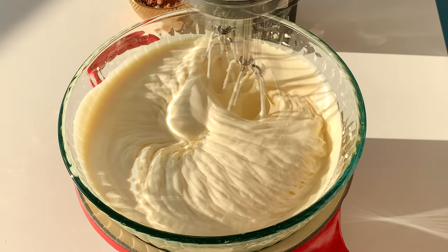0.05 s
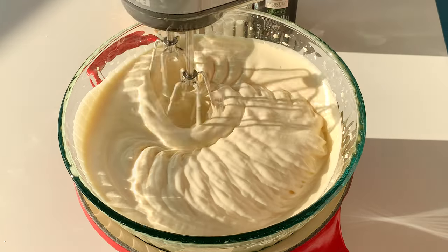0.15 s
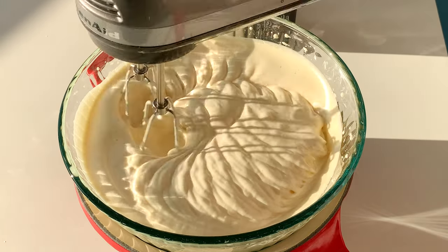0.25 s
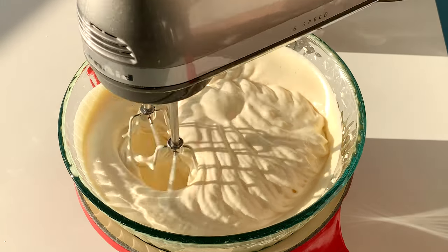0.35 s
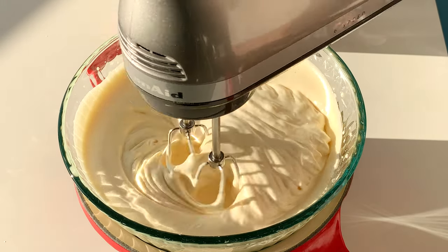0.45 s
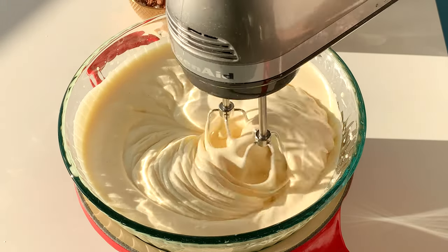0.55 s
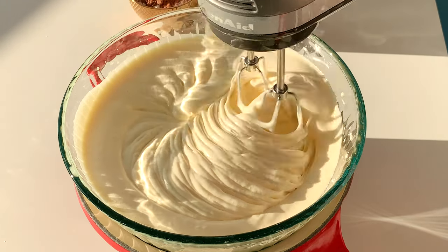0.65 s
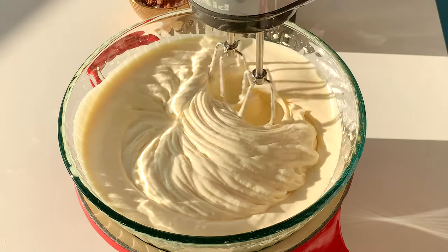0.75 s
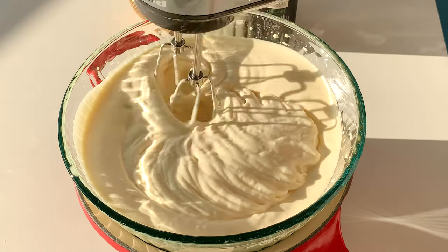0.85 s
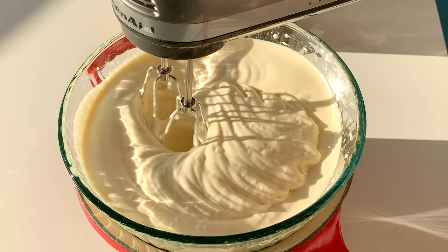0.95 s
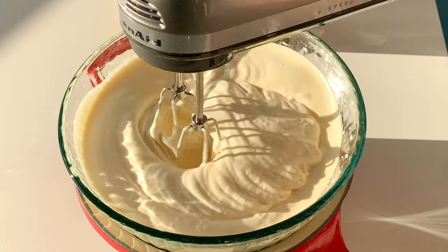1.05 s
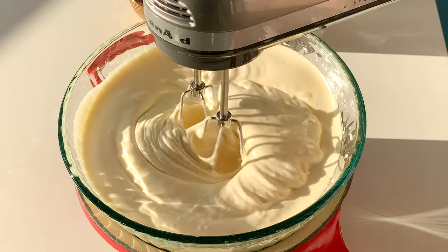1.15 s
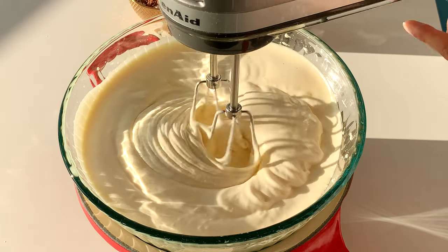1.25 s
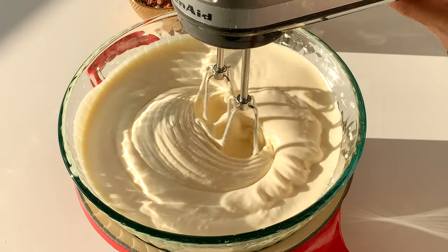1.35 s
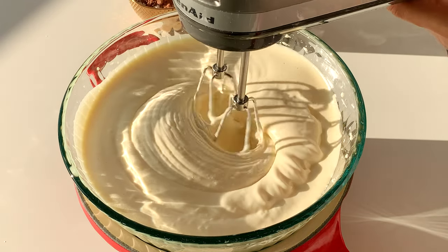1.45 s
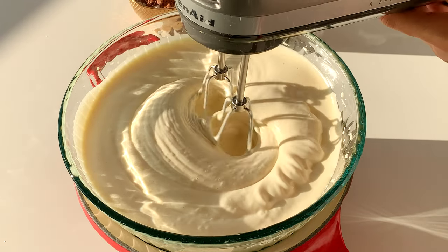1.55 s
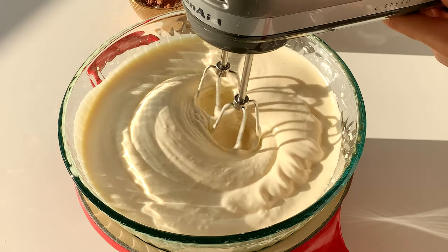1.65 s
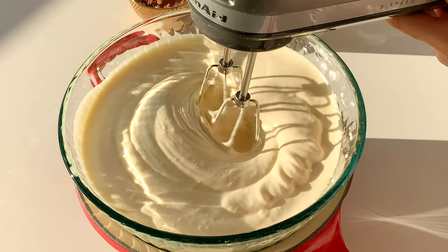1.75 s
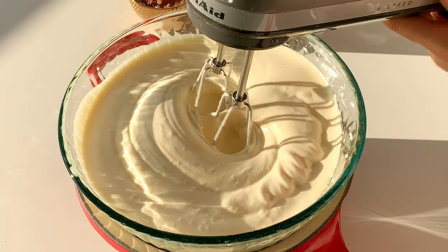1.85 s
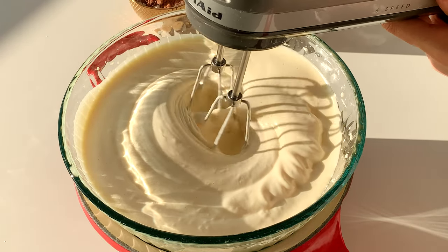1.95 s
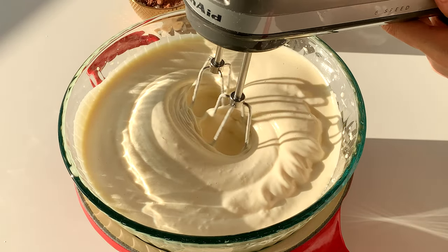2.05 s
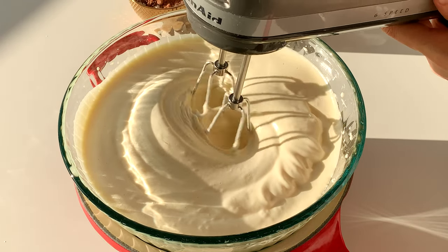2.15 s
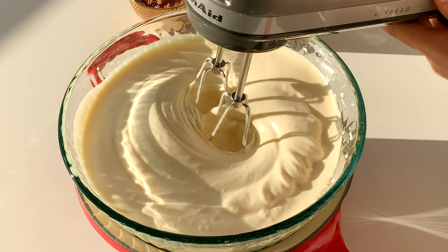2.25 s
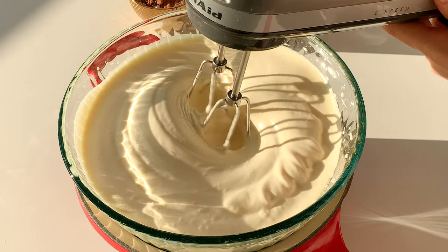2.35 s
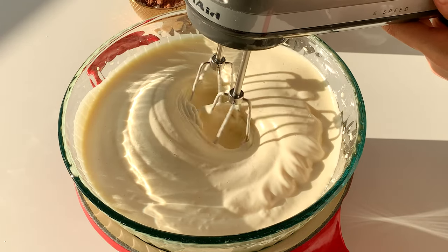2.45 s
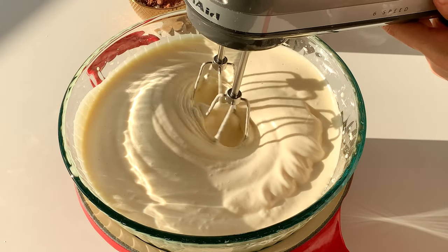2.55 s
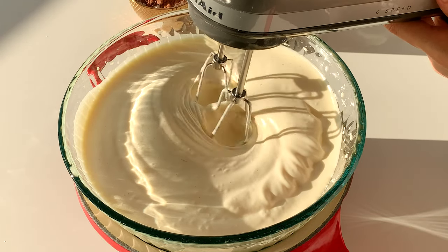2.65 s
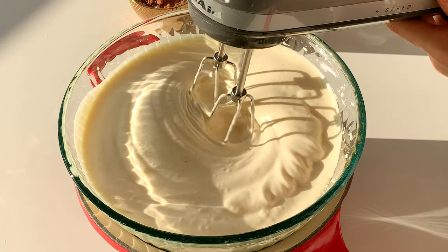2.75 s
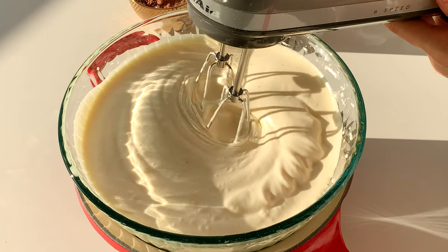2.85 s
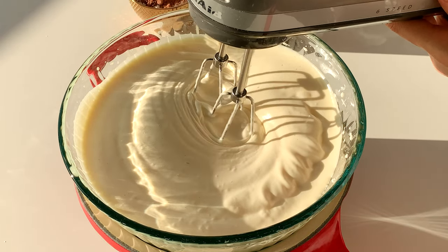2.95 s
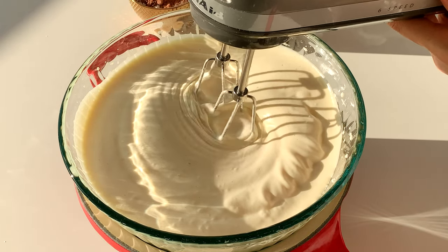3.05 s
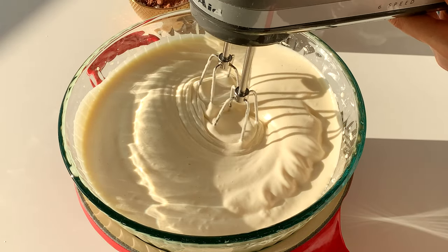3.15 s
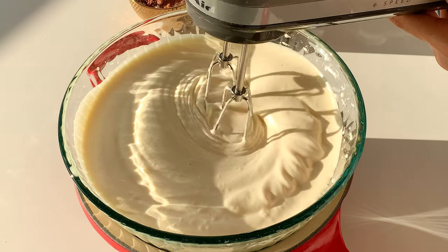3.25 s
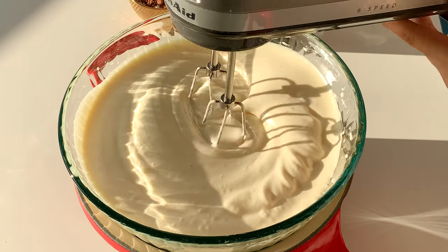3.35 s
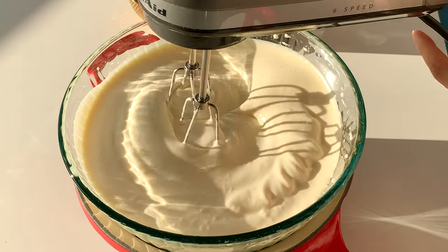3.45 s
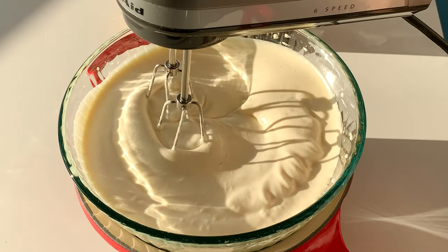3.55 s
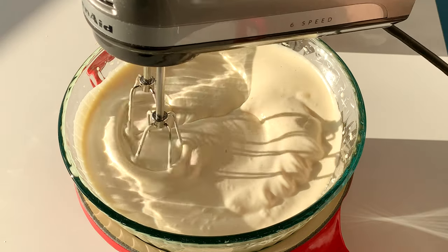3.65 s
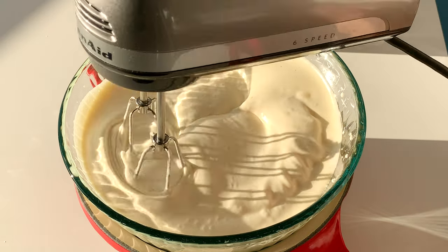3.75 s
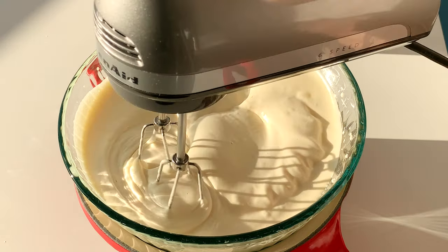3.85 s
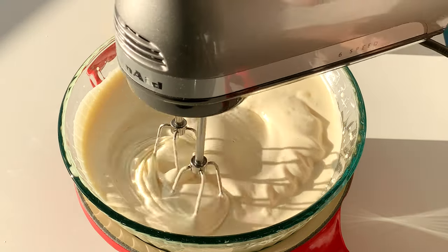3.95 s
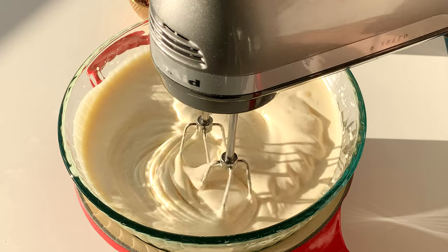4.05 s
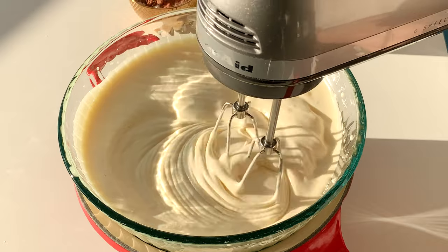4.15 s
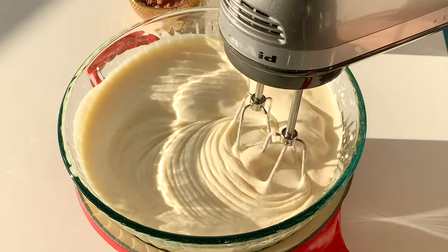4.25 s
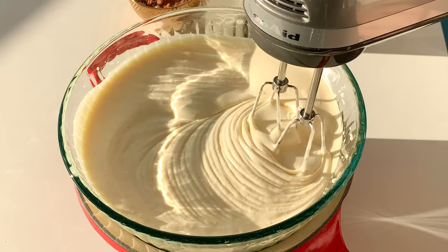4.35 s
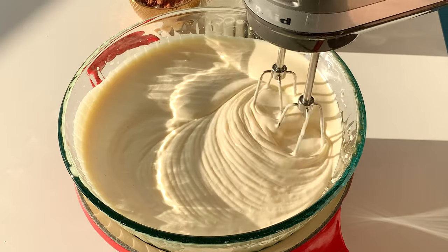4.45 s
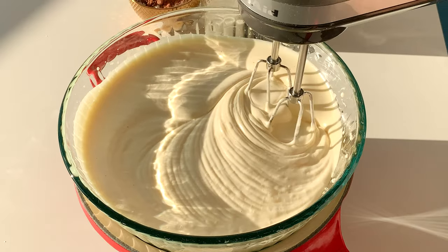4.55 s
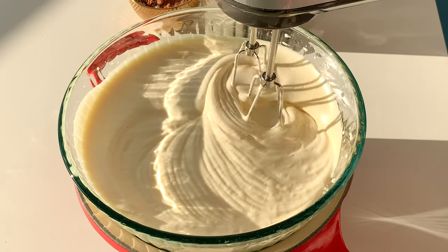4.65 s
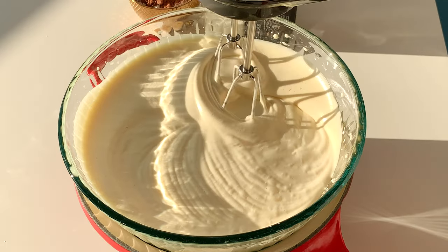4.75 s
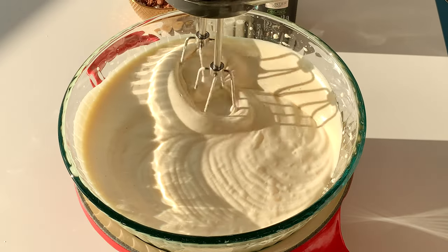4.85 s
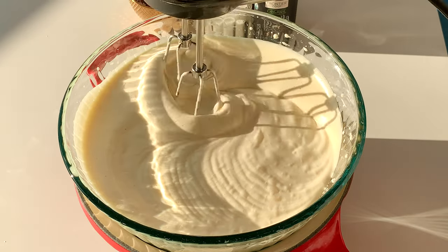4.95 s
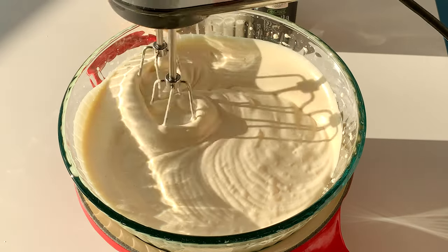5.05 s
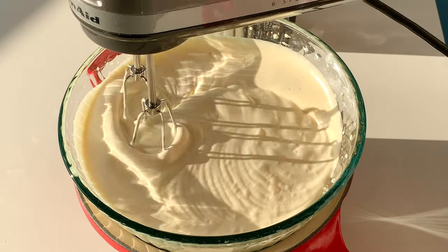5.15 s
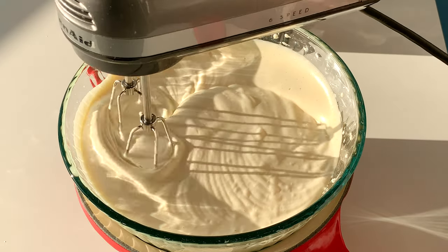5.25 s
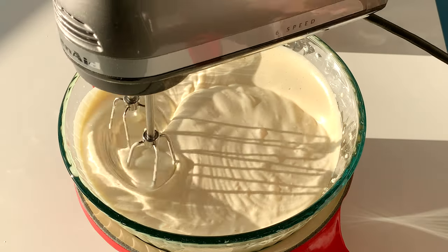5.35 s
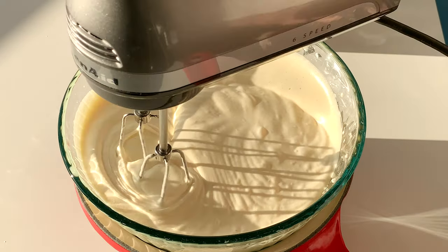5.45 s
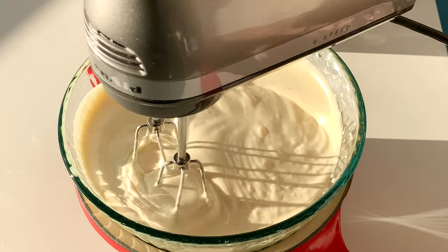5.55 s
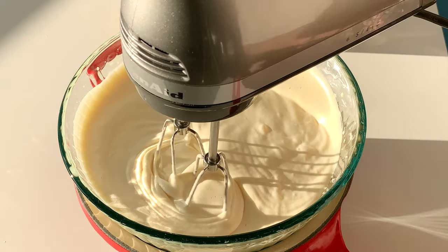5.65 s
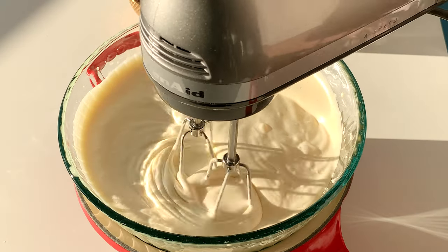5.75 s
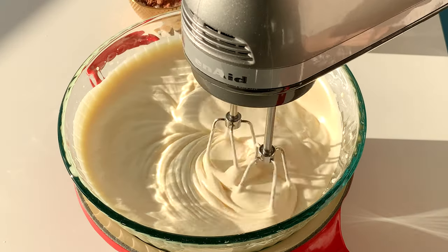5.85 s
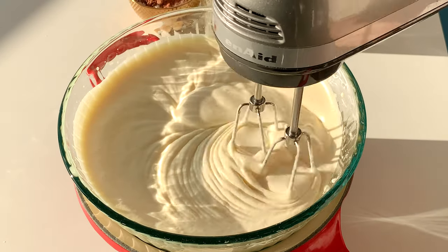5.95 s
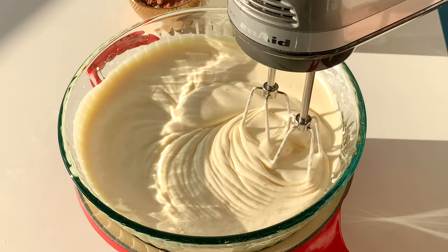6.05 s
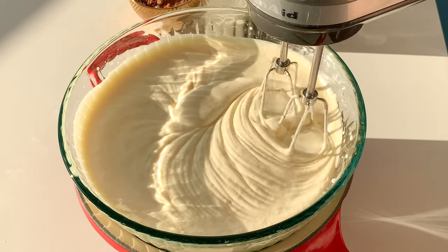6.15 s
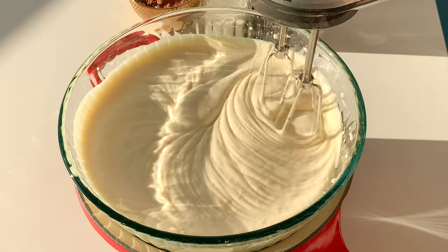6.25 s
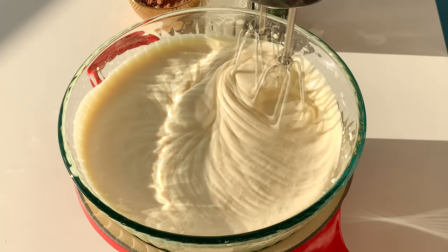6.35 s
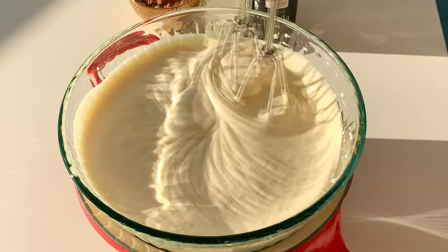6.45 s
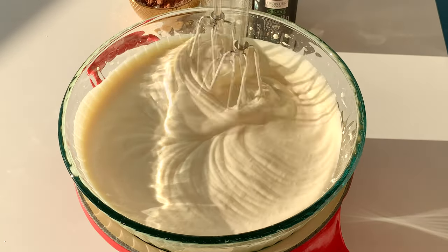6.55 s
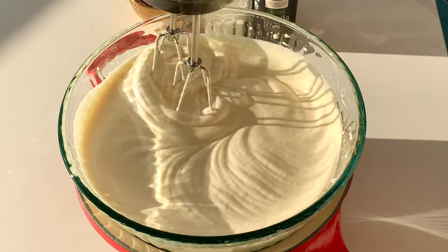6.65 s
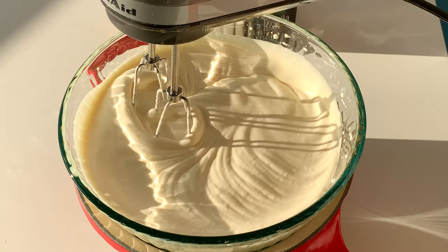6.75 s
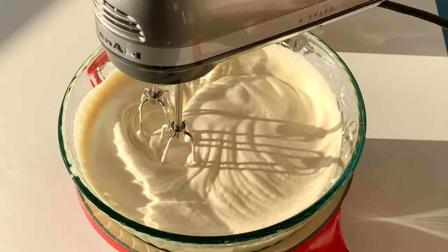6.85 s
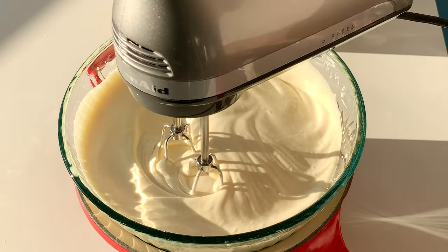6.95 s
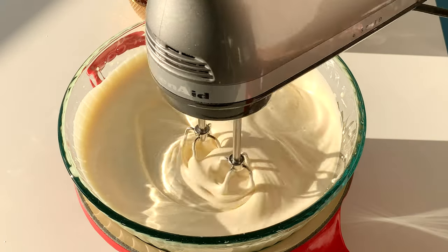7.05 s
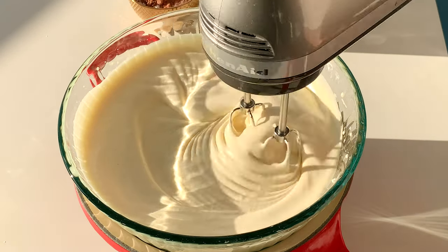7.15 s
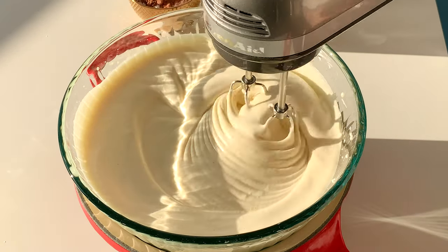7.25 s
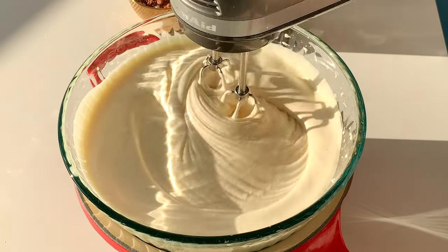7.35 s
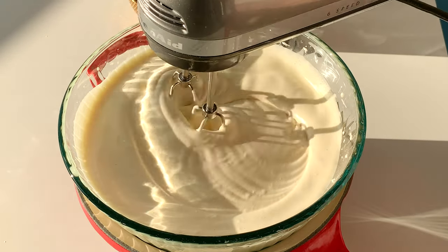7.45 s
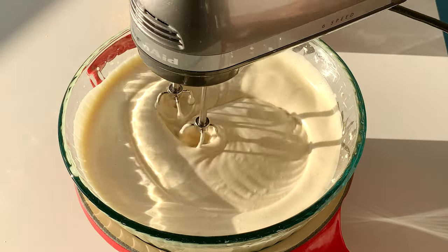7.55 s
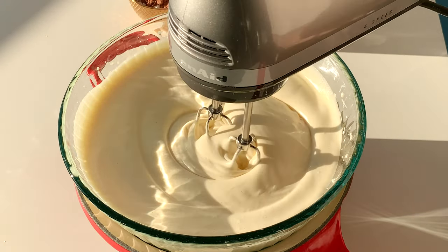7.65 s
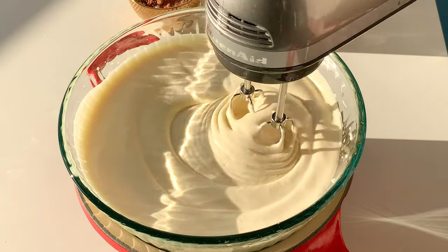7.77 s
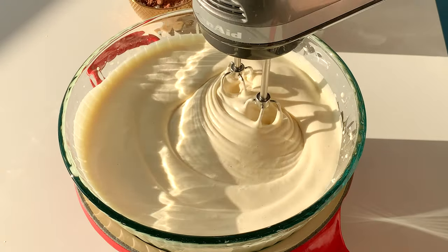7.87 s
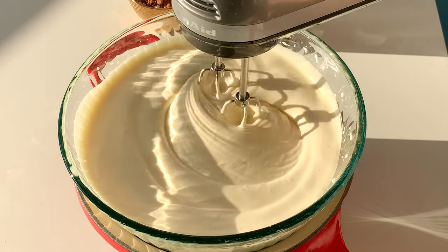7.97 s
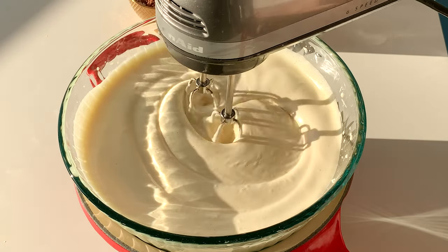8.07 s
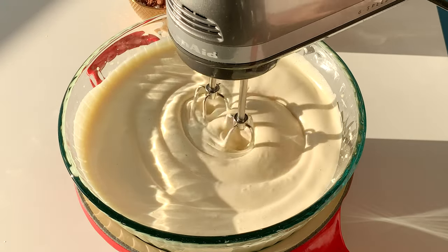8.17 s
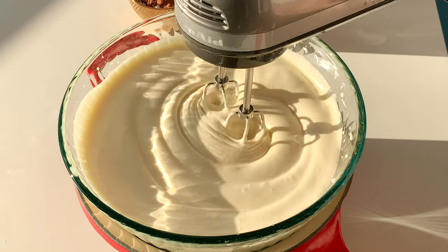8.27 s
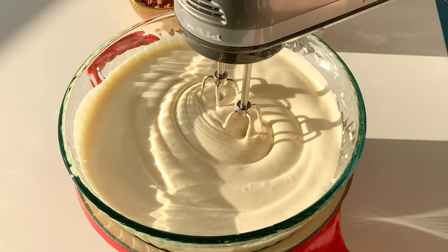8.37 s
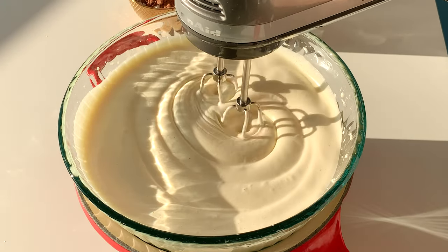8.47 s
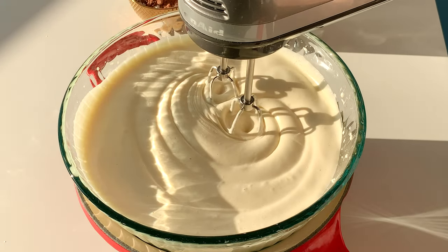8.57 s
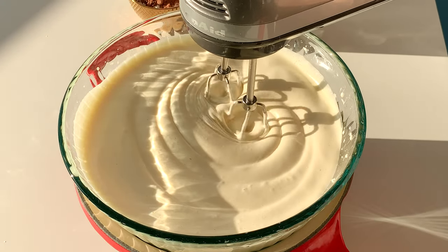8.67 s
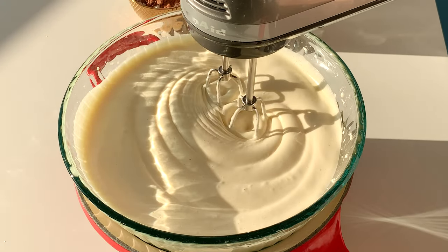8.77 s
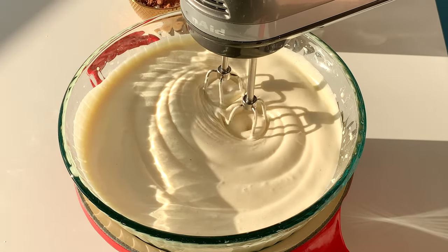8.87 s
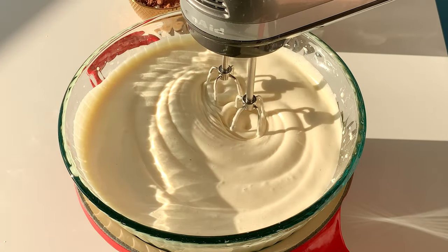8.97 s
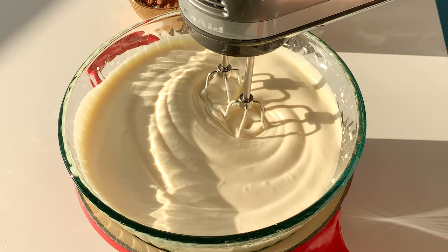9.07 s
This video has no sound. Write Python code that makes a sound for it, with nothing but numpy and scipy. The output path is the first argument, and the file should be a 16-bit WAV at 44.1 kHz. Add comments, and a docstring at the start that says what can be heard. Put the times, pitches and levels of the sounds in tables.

```python
"""A motor whirs close by at a high setting, winds down in surges, then runs on low with a steady hum.
An electric hand mixer beats eggs and sugar in a glass bowl in a kitchen: its tones are multiples of the
shaft speed, modulated by the beater strokes, over noise shaped by its housing. Its wires clack against
the glass as noise bursts that excite decaying modes; at last they rub on the bottom, which booms softly."""
import sys
import numpy as np
from scipy import signal
from scipy.fft import rfft, irfft, next_fast_len
from scipy.io import wavfile
from scipy.ndimage import map_coordinates

SR = 44100
rng = np.random.default_rng(int(sys.argv[2]) if len(sys.argv) > 2 else 0)


def store_wav(level_fs):
    """Save 16-bit WAV to argv[1]."""
    pcm = np.round(np.clip(np.atleast_2d(level_fs), -1, 1) * 32767)
    wavfile.write(sys.argv[1], SR, pcm.T.astype(np.int16))


N = 401751
TIME = np.arange(N) / SR
GRIP_S = 2.711  # the drive grips again after coasting

# motor shaft speed before its small wavering: start_s, speed_hz
SHAFT_SPEED = [(0, 258), (.8, 260), (1.5, 259), (2.37, 259), (2.47, 221), (2.7, 190), (2.87, 141),
               (2.97, 126), (3.06, 122), (3.55, 123.7), (4.9, 120), (5.5, 123.4), (6.15, 123.4),
               (6.55, 124.1), (7.3, 127.6), (7.65, 126), (7.9, 123.6), (9.11, 126)]
# load on the gears at the low setting: start_s, load_db
GEAR_LOAD = [(2.85, -7), (3.08, 1.5), (5, 4), (6, 3), (7.2, 3), (8.3, -3), (9.11, -3.5)]
# the circling mixer swings near: closest_s, half_length_s, nearness (0-1)
NEAR_PASSES = [(.45, 0.58, 0.87), (4.093, 0.34, 0.9), (5.878, 0.33, 0.95), (7.08, 0.17, 0.5),
               (8.4, 0.77, 0.46)]
# response of the mixer's body at the high setting: frequency_hz, level_db (per Hz)
HIGH_BODY = [(40, -29), (160, -17), (270, -11), (600, -7.5), (850, 4.5), (1150, -5.5), (1550, -3),
             (2100, 3.5), (2700, -2.5), (3800, -1), (4900, -6.5), (6400, -7.5), (7050, -7), (8200, -14),
             (15500, -28.5)]
# resonances of the filled bowl struck at the bottom: frequency_hz, width_hz, level_db
BOWL_BOTTOM = [(496.7, 35, 0), (570, 37, -0.5), (894, 190, -15)]
# resonance of the counter under the bowl: frequency_hz, width_hz, level_db
COUNTER_MODE = [(153.5, 43, 0)]
# steady pressure of the wires on the bottom: start_s, level_db
DRAG_LEVEL = [(6.85, -90), (7.02, -66), (7.5, -59), (7.7, -57.5), (7.82, -59), (7.95, -52.5), (8.12, -58),
              (8.3, -61.5), (8.62, -59), (8.87, -60.5), (9.11, -67)]


def amp(db):
    """Decibels to amplitude gain."""
    return 10 ** (np.asarray(db) / 20)


def unit(x):
    """Scale to rms 1."""
    return x / np.sqrt(np.mean(x ** 2) + 1e-20)


def early(x):
    """Scale each blow to rms 1 over its first 25 ms."""
    return x / np.sqrt(np.mean(x[..., :SR // 40] ** 2, axis=-1, keepdims=True))


def along(points, hz):
    """Read (Hz, value) points on a log-frequency axis."""
    f, v = np.transpose(points)
    return np.interp(np.log(hz + 1), np.log(f + 1), v)


def curves(rows):
    """One value per sample for each column after the time."""
    s, *cols = np.transpose(rows)
    return [np.interp(TIME, s, c) for c in cols]


def wobble(rate, step=1):
    """A smooth random curve with `rate` knots a second, read at every step-th sample."""
    knots = rng.standard_normal(int(N * rate / SR) + 4)
    coarse = map_coordinates(knots, [TIME[::32] * rate])
    return np.repeat(coarse, 32 // step)[:len(TIME[::step])]


def swell(s, half):
    """A bell-shaped rise and fall around s seconds."""
    return np.exp(-((TIME - s) / half) ** 2)


def ramp(s, length):
    """Rise from 0 to 1, starting at s seconds."""
    return np.clip((TIME - s) / length, 0, 1)


def filtered(x, response):
    """Linear filtering: the spectrum of x times a response of frequency."""
    n = x.shape[-1]
    m = next_fast_len(n + 8192)
    return irfft(rfft(x, m) * response(np.fft.rfftfreq(m, 1 / SR)), m)[..., :n]


def coloured(x, points):
    """Spectral shaping by (Hz, dB) points, scaled to rms 1."""
    return unit(filtered(x, lambda f: amp(along(points, f))))


def resonate(x, modes):
    """Parallel second-order resonances (Hz, width Hz, dB) with alternating signs."""
    def response(f):
        total = 0
        for k, (centre, width, db) in enumerate(modes):
            damping = 1j * f * width
            total = total + (-1) ** k * amp(db) * centre * 0 + (
                (-1) ** k * amp(db) * damping / (centre * centre - f * f + damping))
        return total
    return filtered(x, response)


def add(track, s, sound):
    """Mix a sound into the track at s seconds."""
    part = track[round(s * SR):][:len(sound)]
    part += sound[:len(part)]


def burst(t, hold, t60):
    """Envelope of a contact: a sudden rise, a hold, then exponential decay."""
    return np.minimum(t / 0.00046, 1) * amp(-60 * np.maximum(t - hold, 0) / t60)


def drive():
    """Rotation as integrated speed: shaft turns, beater strokes and the setting (0 low, 1 high)."""
    # low and high setting: speed_hz of the shaft
    setting_speeds = [123.4, 259.3]
    # low and high setting: stroke_rate_hz of the beaters
    stroke_rates = [13.33, 26.55]
    # the load makes the speed waver
    speed = curves(SHAFT_SPEED)[0] * (1 + 0.001199 * wobble(9) + 0.001391 * wobble(45))
    strokes = np.cumsum(np.interp(speed, setting_speeds, stroke_rates)) / SR
    return np.cumsum(speed) / SR, strokes, np.interp(speed, setting_speeds, [0, 1])


def running(high):
    """Weights that superpose each part's level in dB: low, high, coasting, nearness."""
    cut_s, die_away_s = 2.39, 0.09  # the power is cut
    coasting = ramp(cut_s, die_away_s) * (1 - ramp(GRIP_S, .015))
    near = sum(size * swell(s, half) for s, half, size in NEAR_PASSES)
    return np.array([1 - high, high, coasting, near])


def motor(turns, strokes, high, state):
    """Harmonic synthesis of shaft and gear tones; cyclic load modulates amplitude and phase into sidebands."""
    # motor tones: shaft_multiple, low_setting_db, high_setting_db
    orders = [(2, -83, -85.5), (3, -81.5, -67), (4, -72.5, -63.5), (5, -72, -69), (6, -66.5, -59),
              (7, -78, -98), (8, -67.5, -60), (10, -89, -71), (11, -94, -84), (12, -73.5, -65.5),
              (13, -76.5, -95), (14, -88, -74), (17, -78, -78), (18, -73.5, -85), (22, -80, -87),
              (24, -71.5, -79), (27, -77.5, -75), (30, -82, -100), (36, -72, -100), (42, -83, -100),
              (45, -77.5, -105), (48, -74.5, -115), (74, -83.5, -120)]
    # tones shaken by the beaters at high: shaft_multiple, throb_depth, throb_place (stroke, 0-1),
    # phase_swing (rad), side_offset (strokes), side_level_db, beat_place (0-1), settled_db (added)
    throb_rows = [(3, 0.54, 0.34, 0.14, 2, -9, 0.21, 2.5), (4, 0.31, 0.4, 0.15, -2, -2, 0, -3.5),
                  (6, 0.52, 0, 0.99, 2, -13.5, 0.18, -0.5), (8, 0.51, 0.11, -0.7, -2, -17.5, 0.16, 4),
                  (12, 0.32, 0.98, -0.45, -2, -9.5, 0.1, -1)]
    # levels of three groups of tones: low_db, high_db, coasting_db (added), near_db (added)
    shaft_levels = (-1.5, 0.75, -8, 1.5)
    mesh_levels = (-1, -0.5, -5, -0.7)
    whine_levels = (4, 2.5, -5, -1)
    # shrill whines come and go as the mixer turns: start_s, first_whine_db, second_whine_db
    beam_rows = [(2.8, -3, -6), (2.96, -8, 1), (3.1, -3, 3.5), (3.6, 2.5, -1.5), (4.2, 4, 1.5),
                 (4.7, -1.5, -4.5), (5.15, 0.5, -8), (5.7, 6.5, 0), (6.3, 1.5, -1), (7, -2.5, -1),
                 (7.7, -1.5, -1), (8.3, 4.5, -5), (9.11, -3, -5)]
    # those two whines: shaft_multiple
    beam_orders = [24, 36]
    settle_s = 1.9  # the throb settles from a quick flutter into regular beats
    stagger = 0.13  # until then each tone's throb strays from the beat (strokes)
    rough_db, flutter_db, waver_db = 0.8, 1.8, 0.93  # grain; more before settling; slow waver added at low
    smear = 0.017  # phase jitter at the low setting (radians per multiple of the shaft, up to 48)
    blades_db = -84  # drone of the eight wires sweeping past at the high setting
    size = 32  # samples per step of the slow controls

    def held(slow):
        return np.repeat(slow.astype(np.float32), size)[:N]

    shaft_db, mesh_db, whine_db = np.array([shaft_levels, mesh_levels, whine_levels]) @ state[:, ::size]
    load_db = curves(GEAR_LOAD)[0][::size]
    settled = ramp(0, settle_s)[::size]
    stroke, high = strokes[::size], high[::size]
    low = 1 - high
    angle = 2 * np.pi * (turns % 1).astype(np.float32)
    throbs = {round(k): row for k, *row in throb_rows}
    beams = {k: db[::size] for k, db in zip(beam_orders, curves(beam_rows))}
    out = np.zeros(N)
    for k, low_db, high_db in orders:
        k = round(k)
        shrill = k >= 10
        if 6 <= k <= 8:  # meshing gears
            section_db = mesh_db + load_db * low
        elif shrill:
            section_db = whine_db + 0.35 * load_db * low
        else:
            section_db = shaft_db
        # short waves beam past as the mixer moves
        beam_db = beams.get(k, 0) + (1.5 if shrill else .6) * wobble(2.335, step=size)
        slow_db = (.4 + waver_db * low) * wobble(15, step=size)
        grain_db = (rough_db + flutter_db * (1 - settled)) * wobble(95, step=size)
        own = stroke + stagger * (1 - settled) * wobble(18.2, step=size)
        phase = k * angle + held(smear * min(k, 48) * low * wobble(30, step=size))
        if k in throbs:
            depth, place, swing, offset, side_db, beat, settled_db = throbs[k]
            shaken = phase + held(swing * high * np.sin(2 * np.pi * (own - place)))
            side_phase = phase + held(2 * np.pi * round(offset) * (own - beat))
            tone = np.sin(shaken) + amp(side_db) * np.sin(side_phase)
            section_db = section_db + settled_db * settled * high
        else:
            tone, depth, place = np.sin(phase), .3, .35
        throb = 1 + (0.17 + high * depth * settled) * np.cos(2 * np.pi * (own - place))
        level_db = low_db * low + high_db * high + section_db + beam_db + slow_db + grain_db
        out += held(amp(level_db) * throb) * tone
    drone = held(amp(blades_db) * high) * np.sin(2 * np.pi * 8 * strokes)
    return np.sqrt(2) * (out + drone)  # a sine of rms 1 has this peak


def hum(high):
    """Periodic forcing: the speed control chops the current and the windings sing at its harmonics."""
    # hum at the low setting: chopping_multiple, level_db
    hum_lines = [(1, -24.5), (2, -23.5), (3, -15.5), (4, -1.5), (5, -7), (6, -11), (8, -12)]
    # overall hum level: start_s, level_db
    hum_level = [(3, -58), (4.8, -56.5), (5.7, -58.5), (6.45, -53), (6.7, -61), (7.4, -55), (9.11, -58.5)]
    chop_hz = 156.0
    lines = np.zeros(N)
    for k, db in hum_lines:
        level = amp(db + 1.7 * wobble(4.5) + 1.5 * wobble(35))
        lines += level * np.sin(2 * np.pi * (round(k) * chop_hz * TIME + rng.random()))
    low_hum = amp(curves(hum_level)[0]) * np.clip(1 - 3 * high, 0, 1) * lines
    return low_hum + amp(-79.5) * high * np.sin(2 * np.pi * chop_hz * TIME)


def whir(turns, strokes, high, state):
    """Source and filter: stroke-periodic tooth roughness and pulsing brush and fan noise drive the body."""
    # response of the mixer's body at the low setting: frequency_hz, level_db (per Hz)
    low_body = [(40, -25), (160, -16.5), (300, -12.5), (550, -7.5), (830, 4), (1130, -7.5), (1500, 1),
                (2050, -3), (2600, -8.5), (3800, -7), (4850, -16), (5700, -10.5), (6120, -14.5),
                (6700, -9.5), (8200, -17.5), (15500, -27)]
    # levels of three noise bands: low_db, high_db, coasting_db (added), near_db (added)
    rattle_levels = (-58.5, -55, -5.5, 1.1)
    hiss_levels = (-62.5, -55.5, -4, 1)
    fizz_levels = (-72.5, -69, -5.5, -0.5)
    rattle_db, hiss_db, fizz_db = np.array([rattle_levels, hiss_levels, fizz_levels]) @ state
    # at the low setting the load shows: dB of rattle per dB of load
    rattle_db = rattle_db + 0.26 * (1 - high) * curves(GEAR_LOAD)[0]
    teeth = rng.standard_normal(size=2048)
    repeating = unit(map_coordinates(teeth, [strokes % 1 * len(teeth)], mode="grid-wrap"))
    force = unit(amp(-2.5) * repeating + rng.standard_normal(N))
    stroke_db = ((0.67 + 1.0 * high) * np.cos(2 * np.pi * strokes)
                 + 0.44 * (1.5 - high) * np.cos(8 * np.pi * strokes))
    shaft_db = 0.86 * np.cos(2 * np.pi * turns) + 1.0 * np.cos(8 * np.pi * turns)
    force *= amp(stroke_db + shaft_db + 0.5 * wobble(15))
    size = next_fast_len(N)
    spectrum, f = rfft(force, size), np.fft.rfftfreq(size, 1 / SR)

    def band(shaped, lo, hi):
        return unit(irfft(shaped * (f >= lo) * (f < hi), size)[:N])

    out = np.zeros(N)
    for body, share in ((HIGH_BODY, high), (low_body, 1 - high)):
        shaped = spectrum * amp(along(body, f))
        rattle = amp(rattle_db) * band(shaped, 0, 2900)
        hiss = amp(hiss_db) * band(shaped, 2900, 8500)
        fizz = amp(fizz_db) * band(shaped, 8500, SR)
        out += np.sqrt(share) * (rattle + hiss + fizz)  # crossfade at equal power
    return out


def swish(x):
    """Time-varying filtering: bands of the whir rise and fall as the mixer circles, slower between passes."""
    # depth of the moving bands: frequency_hz, depth_db
    drift_depth = [(300, 0), (1500, 0.7), (4000, 1.2), (9000, 0.5), (15000, 6)]
    hz, t, z = signal.stft(x, SR, nperseg=512)
    moving = 0.134 + sum(size * swell(s, half) for s, half, size in NEAR_PASSES) ** .5
    travel = np.interp(t, TIME, np.cumsum(moving) / SR)
    knots = rng.standard_normal(size=(160, 160))
    place = np.broadcast_arrays(hz[:, None] / 420 + 0.93 * np.sin(2.55 * travel), 4 * travel)
    field = map_coordinates(knots, place, order=2, mode="grid-wrap")
    gain = amp(along(drift_depth, hz)[:, None] * field)
    return signal.istft(z * gain, SR, nperseg=512)[1][:N]


def gearbox(turns):
    """Cavity resonance: teeth grind once a turn in the gearbox's hollow, hardest just after the drive grips."""
    # hollow of the gearbox: frequency_hz, width_hz, level_db
    hollow = [(1550, 430, 0)]
    # level of the grinding: start_s, level_db
    grind_level = [(0, -65.5), (2.35, -60.5), (2.69, -64), (2.78, -57), (2.95, -59), (3.4, -61.5),
                   (4.2, -67), (5.4, -65), (6.7, -60), (7.6, -84), (9.11, -85)]
    grind = rng.standard_normal(N) * amp(4 * np.cos(2 * np.pi * turns) + 4.1 * wobble(70))
    return amp(curves(grind_level)[0]) * unit(resonate(resonate(grind, hollow), hollow))


def ticks(turns, strokes, state):
    """Impulse excitation: at high, gears knock through their play twice a turn and ring the housing."""
    # housing resonances: frequency_hz, width_hz, level_db
    housing_modes = [(3170, 79, -8), (3735, 100, 1.5), (3850, 170, -8.5), (5500, 390, -10.5),
                     (7160, 400, -10.5)]
    tick_db, spread_db = -64.01, 6.5  # overall level; unevenness from knock to knock
    throb_db, throb_place = 8, 0.31  # swell once a stroke; its place in the stroke (0-1)
    _, high, coasting, _ = state
    at = np.flatnonzero(np.diff(np.floor(2 * turns)))
    spread = np.minimum(rng.standard_normal(len(at)), 2)
    level_db = spread_db * spread + throb_db * np.cos(2 * np.pi * (strokes[at] - throb_place))
    knocks = np.zeros(N)
    knocks[at] = rng.choice([-1, 1], len(at)) * amp(level_db)
    return amp(tick_db - 6 * coasting) * high * unit(resonate(knocks, housing_modes))


def vents(state):
    """Flow noise in resonant slots: cooling air hoots softly, louder when the slots come near."""
    # hoot of the air: low_db, high_db, coasting_db (added), near_db (added)
    vent_levels = (-69.5, -72, 4, 12.5)
    # cooling slots: frequency_hz, width_hz, level_db (of one of two passes)
    slot_modes = [(1257, 190, -6), (2000, 144, -2.5)]
    hoot = resonate(resonate(rng.standard_normal(N), slot_modes), slot_modes)
    return amp(np.dot(vent_levels, state)) * unit(hoot)


def counter(bowl, high):
    """Structure-borne vibration: the counter rumbles after the bowl shakes and thrums when beaters press."""
    # a hand steadies the bowl with a soft thump: centre_s, half_length_s, level_db
    hand_thump = (1.25, 0.076, -71)
    keep = np.exp(-1 / (SR * .15))  # the shaking is averaged over 0.15 s
    shake = np.sqrt(signal.lfilter([1 - keep], [1, -keep], bowl ** 2))
    rumble = unit(resonate(rng.standard_normal(N), [(34, 65, 0)]))
    thrum = unit(resonate(resonate(rng.standard_normal(N), COUNTER_MODE), COUNTER_MODE))
    pressure = amp(curves(DRAG_LEVEL)[0])
    s, half, hand_db = hand_thump
    rumble_level = amp(-101 - 5 * high) + amp(-55) * shake + amp(-22) * pressure
    thrum_level = amp(-89.5) + amp(-12.5) * pressure + amp(hand_db) * swell(s, half)
    return rumble_level * rumble + thrum_level * thrum


def contacts():
    """Excitation depends on the point of contact: one row per blow sets what rings."""
    # a beater touches the glass: start_s, clack_db, boom_db, ring_centre_hz, extra_ring_db, extra_ping_db
    touches = [(0.1204, -50, -68, 14200, 4, 0), (0.8364, -43, -49, 12800, -1.5, 3),
               (.8729, -46.5, -52.5, 12800, -3, 4), (3.8393, -40, -47.5, 10900, 0, 1),
               (4.2737, -51.5, -54.5, 12710, 4, 13), (4.2955, -51.5, -57, 12700, -3, 14),
               (4.3314, -39, -51, 11800, 1, 7), (4.4179, -45.5, -56, 12900, -6, 7),
               (4.7755, -44, -55.5, 13110, 0.5, 4), (4.8523, -41, -55, 13090, 1, -2),
               (4.9267, -36.5, -51, 14700, 2.5, 0), (5.0629, -42, -54, 14500, -1, 5),
               (5.0795, -34.5, -48, 12700, -1.5, -4), (5.9164, -57, -61, 12700, 0, 0),
               (5.9573, -61, -57, 12700, 3, 0), (5.9923, -38.5, -50, 12700, 2, -5),
               (6.0787, -45.5, -51, 10100, 0, 14.5), (6.099, -47.5, -50, 10090, 0, 15),
               (6.1574, -38.5, -51, 12800, 1, 8), (6.2414, -43, -48.5, 10100, 1.5, 8),
               (6.2615, -48, -52, 12900, 0, 14), (6.2694, -47, -50, 14400, 0, 2),
               (6.2857, -38.5, -45.5, 14500, 1, 3), (6.3678, -55, -58, 12800, -5, -3),
               (6.4223, -48, -50, 14400, -3, 7), (6.4358, -36.5, -41.5, 14440, 1.5, -4),
               (6.4614, -41, -49, 14580, -1, 0), (6.4754, -42, -46, 14400, 0, 0),
               (6.495, -44, -50, 13000, -2, 9), (6.512, -38, -47, 14800, 0.5, 8),
               (6.6274, -46, -58, 14620, 4, 2), (6.6443, -41, -46.5, 14500, 2, 11),
               (6.6573, -36.5, -45, 12920, 3.5, 6), (6.9576, -43.5, -44, 9700, 0, 0),
               (6.9824, -50, -52, 10110, 2, 0), (6.9934, -47.5, -47, 10110, -1, 0),
               (7.0135, -51, -57, 10240, -3, 0), (7.1065, -50, -65, 11600, 4, 0),
               (7.1217, -44.5, -47, 9700, 3, 0), (7.1635, -43, -53, 10140, -3, 0),
               (7.2524, -46.5, -47, 11600, 5, -5), (7.2854, -51, -53, 12900, 4, 0),
               (7.2938, -39.5, -48, 12900, 0, -2), (7.3585, -45, -54, 9800, 6, -3),
               (7.3661, -39, -58, 12900, 0, 0), (7.4235, -46.5, -37, 10700, -14, 0),
               (7.7128, -63, -58, 11740, 10, 0), (7.7563, -47, -54, 10130, 0, 0),
               (7.8375, -55, -41, 11700, 12, 0), (7.8445, -45.5, -42, 12900, -3, 0),
               (7.8895, -40.5, -44, 11610, 3, 0), (7.9239, -49.5, -46, 10690, 0, 0),
               (7.9488, -51, -44.5, 10800, 9, 0), (8.9114, -64, -48.5, 10700, 3, 0),
               (8.9684, -54.5, -58, 11700, 5, -3), (9.0035, -55, -43, 10790, -2, 0),
               (9.0915, -59, -48, 10710, 0, 0)]
    # a blow above the batter, over the clack: steel_ring_db, shaft_ping_db, rim_ping_db, counter_thud_db
    bare_blow = (-11.5, -20, -33.5, -32)
    # the same for a blow under the batter: steel_ring_db, shaft_ping_db, rim_ping_db, counter_thud_db
    covered_blow = (-19, -43, -35, -17.5)
    deep_s = 6.8  # the beaters sink into the batter
    rim_s, rim_half_s, rim_extra_db = 6.48, 0.28, 22  # wires strike near the rim, which pings more
    rows = []
    for start, db, boom_db, centre_hz, ring_db, ping_db in touches:
        steel_db, shaft_db, rim_db, thud_db = covered_blow if start > deep_s else bare_blow
        rim_db += rim_extra_db * np.exp(-((start - rim_s) / rim_half_s) ** 2)
        rows.append((start, db, db + steel_db + ring_db, centre_hz,
                     db + shaft_db + ping_db, db + rim_db, boom_db, db + thud_db))
    return rows


def steel(t, centre_hz, noise):
    """Modal synthesis: chatter noise convolved with decaying wire modes, strongest near one pitch."""
    # steel beater wires: frequency_hz, level_db, t60_s
    wire_modes = [(4090, -9.5, 0.14), (7100, -6, 0.025), (7190, 9.5, 0.03), (9740, -6, .06),
                  (10180, -1, 0.063), (10900, 2, 0.039), (11040, -9, 0.15), (11830, 3, 0.042),
                  (12150, -5, .05), (13130, 4, 0.05), (13000, -11, 0.051), (14300, -6, 0.038),
                  (14720, -8, 0.055), (15400, -13, .04)]
    detune = 0.0049  # clinging batter shifts the pitch from blow to blow (share)
    hz, db, t60 = np.transpose(wire_modes)
    octaves_off = np.minimum(abs(np.log2(hz / centre_hz)), .25)
    weights = amp(db + rng.normal(0, 2.0, (len(centre_hz), len(hz))) - 59 * octaves_off)
    pitches = hz * (1 + detune * rng.standard_normal(weights.shape))
    decays = amp(-60 * t / t60[:, None])
    wires = np.array([w @ (decays * np.sin(2 * np.pi * f[:, None] * t)) for w, f in zip(weights, pitches)])
    chatter = (noise * burst(t, hold=0.0012, t60=0.009))[:, :SR // 50]
    return early(signal.fftconvolve(chatter, wires, axes=1)[:, :len(t)])


def glass(t, back):
    """Modal synthesis: the spot struck sets how strongly each decaying mode of the bowl's wall rings."""
    # glass wall damped by the batter: frequency_hz, level_db, t60_s, back_db (added at the back of the bowl)
    wall_modes = [(303, -15.5, 0.047, -4), (579, 4.5, 0.057, -9.5), (781, -4, .05, 5),
                  (837, -2.5, 0.054, 3.5), (941, -6, 0.047, 5.5), (1277, -7.5, 0.11, -7),
                  (1507, -9, 0.053, -2), (1600, -9, 0.052, 4), (1978.3, -4.5, 0.035, 1),
                  (2577, -6.5, 0.056, -0.5), (3200, -13, .05, -7), (3668, -5, 0.052, 1),
                  (4188, -5.5, .06, -1)]
    spread_db, detune = 4, .012  # each mode's level and pitch (share) vary with the spot
    hz, db, t60, back_db = np.transpose(wall_modes)[..., None]
    rings = []
    for behind, draws in zip(back, rng.standard_normal((len(back), 3, len(hz), 1))):
        level, pitch, phase = draws
        waves = np.sin(2 * np.pi * (hz * (1 + detune * pitch) * t + phase))
        levels = amp(db + back_db * behind + spread_db * level)
        rings.append(np.sum(levels * waves * burst(t, hold=.0022, t60=t60), axis=0))
    return np.array(rings) * np.minimum(t / 0.0017, 1)


def knock(x, modes):
    """Forced resonance: every blow in x sets the modes ringing."""
    return early(resonate(x.ravel(), modes).reshape(x.shape))


def bowl_boom(s, push, back):
    """Resonance of the filled bowl: its modes depend on whether side, back or bottom is struck."""
    # bowl struck at the side: frequency_hz, width_hz, level_db
    side_modes = [(330, 130, -13.5), (574, 52, 2.5), (794, 160, -1.5), (910, 145, -2.5)]
    # bowl struck at the back: frequency_hz, width_hz, level_db
    back_modes = [(334, 140, -12), (614, 94, -3.5), (777, 130, -4), (963, 99, -1)]
    # the batter softens blows on the bottom: frequency_hz, width_hz, level_db
    batter_cushion = [(550, 510, 0)]
    bottom_s = 7.33  # the beaters reach the bottom
    sideways = filtered(push, lambda f: f > 210)
    wall = np.where(back, knock(sideways, back_modes), knock(sideways, side_modes))
    return np.where(s > bottom_s, knock(knock(push, batter_cushion), BOWL_BOTTOM), wall)


def clacks():
    """Impact sound: each blow chatters on the glass and excites the modes of wires, bowl and counter."""
    # spectrum of a clack: frequency_hz, level_db (per Hz)
    clack_colour = [(150, -37), (400, -9), (800, -5), (1150, -4.5), (1900, -.5), (2900, -4), (4200, -8.5),
                    (6200, -5.5), (8500, -14.5), (10500, -12.5), (15500, -31)]
    # the beaters are at the back of the bowl: centre_s, half_length_s
    back_times = [(.85, .2), (4.94, .24), (6.58, .1)]
    columns = np.transpose(contacts())[..., None]
    s, clack_db, steel_db, centre_hz, shaft_db, rim_db, boom_db, thud_db = columns
    t = np.arange(SR // 8) / SR

    def noise():
        return rng.standard_normal((len(s), len(t)))

    def colour(points):
        return coloured(noise().ravel(), points).reshape(len(s), -1)

    def ping(hz, t60):
        pitch = hz + 20 * rng.standard_normal(s.shape)
        return early(np.sin(2 * np.pi * pitch * t) * burst(t, hold=0.0016, t60=t60))

    back = np.any([abs(s - middle) < half for middle, half in back_times], axis=0)
    clack = colour(clack_colour) * burst(t, hold=0.0034, t60=0.058)
    crack_colour = [(3000, -10), (9000, -15), (13000, 3.0)]
    crack = early(colour(crack_colour) * burst(t, hold=0.0016, t60=0.022))
    push = noise() * burst(t, hold=0.0063, t60=0.052)
    thud = knock(knock(push, COUNTER_MODE), COUNTER_MODE)
    blows = amp(clack_db) * (amp(-1.5) * clack + amp(-7.5) * early(glass(t, back)))
    blows += amp(steel_db) * (steel(t, centre_hz, noise()) + amp(-0.5) * crack)
    blows += amp(shaft_db) * ping(5880, 0.059) + amp(rim_db) * ping(7895, 0.22)
    blows += amp(boom_db - 1.5) * bowl_boom(s, push, back) + amp(thud_db) * thud
    out = np.zeros(N)
    for start, blow in zip(s.ravel(), blows):
        add(out, start, blow)
    return out


def kitchen(x):
    """Reverberation: convolution with decaying noise makes a short tail from the counter and walls."""
    # decay of the room: frequency_hz, t60_s
    room_decay = [(150, 0.36), (1500, 0.24), (12000, 0.19)]
    hz, t, z = signal.stft(rng.standard_normal(SR // 3), SR, nperseg=256)
    tail = signal.istft(z * amp(-60 * t / along(room_decay, hz)[:, None]), SR, nperseg=256)[1]
    return signal.fftconvolve(x, tail / np.linalg.norm(tail))[:N]


def switch():
    """Transient noise: the speed switch snaps over two detents with short, bright plastic clicks."""
    # clicks of the switch: start_s, level_db (before the decay)
    detent_clicks = [(2.3718, -42), (2.6694, -42)]
    # spectrum of a click: frequency_hz, level_db (per Hz)
    snap_colour = [(500, -31), (2000, -5), (4500, 3), (9000, -5), (13000, -2), (15500, -4)]
    t, out = np.arange(SR // 16) / SR, np.zeros(N)
    for s, db in detent_clicks:
        snap = coloured(rng.standard_normal(len(t)), snap_colour)
        add(out, s, amp(db) * snap * burst(t, hold=0.0015, t60=0.022))
    return out


def wind_down(turns, strokes, coasting):
    """Swept resonance: coasting tones surge as they pass a housing mode; then the drive grips with a growl."""
    # swelling tones: shaft_multiple, coasting_db, gripping_db
    swept_tones = [(4, -63, -59), (6, -83, -65), (8, -60.5, -63), (10, -78, -62), (12, -72, -57.5),
                   (24, -67, -56.5)]
    # spectrum of the growl: frequency_hz, level_db (per Hz)
    growl_colour = [(200, -23), (600, -16), (900, -4), (1150, -5), (1700, 5), (2150, -6), (2700, -8),
                    (4000, -13), (8000, -15), (15500, -28)]
    surge_hz, surge_width_hz, surge_db = 780, 66, 8.5  # resonance of the housing
    grip_db, sing_s, fade_s = -53, 0.13, 0.15  # growl before its decay; how long the gears sing and fade
    speed, out = curves(SHAFT_SPEED)[0], np.zeros(N)
    gripping = ramp(GRIP_S, 0.0074) * (1 - ramp(GRIP_S + sing_s, fade_s))
    stroke = np.cos(2 * np.pi * (strokes - .7))
    for k, coast_db, gears_db in swept_tones:
        hz = round(k) * speed
        body_db = along(HIGH_BODY, hz) + surge_db * np.exp(-((hz - surge_hz) / surge_width_hz) ** 2)
        coast = amp(coast_db + min(.3 * k, 2.2) * wobble(29.94)) * coasting
        coast = coast * np.sqrt(np.abs(1 + 1.03 * stroke))
        grip = amp(gears_db + 2.6 * wobble(70)) * gripping * (1 + 0.57 * stroke)
        phase = 2 * np.pi * round(k) * turns + min(0.051 * k, .8) * wobble(260)
        out += (coast + grip) * amp(body_db) * np.sin(phase)
    t = np.arange(SR // 2) / SR
    jolts = rng.standard_normal(len(t)) * amp(4.5 * wobble(221)[:len(t)])
    growl = coloured(jolts, growl_colour)
    add(out, GRIP_S, amp(grip_db) * growl * burst(t, hold=0.046, t60=.4))
    return out


def rubs(turns):
    """Friction excitation: shaking wires growl over the bottom; where one bears down, the bowl booms."""
    # a wire bears down harder: centre_s, half_length_s, level_db
    hard_rubs = [(7.528, 0.031, -51), (7.693, 0.024, -59), (8.176, .018, -52.5), (8.235, 0.027, -49.5),
                 (8.31, 0.018, -47.5), (8.383, 0.021, -47.5), (8.465, 0.019, -51), (8.523, 0.026, -50),
                 (8.601, 0.021, -51), (8.672, .014, -44.5), (8.751, 0.017, -51), (8.853, .02, -55),
                 (8.961, 0.017, -58.5)]
    rub_hz, wander = 501, 0.56  # pitch of the rubbed bottom; how far its phase wanders (radians)
    scrape = unit(resonate(rng.standard_normal(N), BOWL_BOTTOM))
    scrape = unit(scrape / np.abs(signal.hilbert(scrape)) ** .5)  # friction evens out the swing
    growl = amp(curves(DRAG_LEVEL)[0]) * unit(scrape + amp(-4.5) * np.sin(8 * np.pi * turns))
    tone = np.sin(2 * np.pi * rub_hz * TIME + wander * wobble(110))
    boom = unit(tone + amp(-5.5) * scrape)
    return growl + boom * sum(amp(db) * swell(s, half) for s, half, db in hard_rubs)


def scene():
    """Mid-side stereo: mixer and bowl lie almost straight ahead; their echoes differ between the ears."""
    # likeness of left and right: frequency_hz, likeness (0-1)
    ear_likeness = [(30, 0.75), (70, 1), (200, 0.98), (1500, 0.98), (4000, 0.98), (8000, 0.99),
                    (14000, 0.96)]
    # the glass scatters its clinks sideways: frequency_hz, level_db
    scatter_level = [(1000, -35), (4000, -32), (9000, -11), (15000, -22)]
    turns, strokes, high = drive()
    state = running(high)
    _, _, coasting, _ = state
    mixer = motor(turns, strokes, high, state) + hum(high)
    mixer += swish(whir(turns, strokes, high, state)) + gearbox(turns)
    mixer += ticks(turns, strokes, state) + vents(state)
    mixer += switch() + wind_down(turns, strokes, coasting)
    bowl = clacks() + rubs(turns)
    direct = mixer + bowl + amp(-11.5) * kitchen(bowl) + counter(bowl, high)
    # side gain that gives the wanted likeness
    width = lambda f: np.tan(np.arccos(np.clip(along(ear_likeness, f), 0, 1)) / 2)
    scatter = lambda f: amp(along(scatter_level, f))
    side = filtered(kitchen(direct), width) + filtered(kitchen(bowl), scatter)
    return np.array([direct + side, direct - side]) * amp([[-.15], [.15]])


def record(dry):
    """Low-pass filtering: nothing is kept from 15.9 kHz up."""
    return filtered(dry, lambda f: f < 15900)


dry = scene()
out = record(dry)
store_wav(out)
```